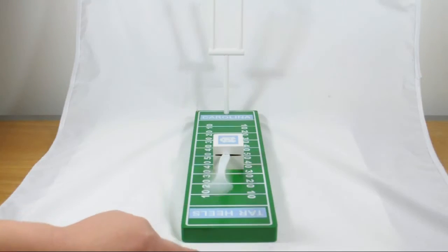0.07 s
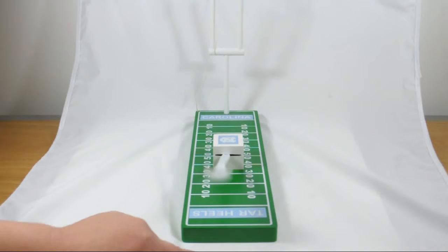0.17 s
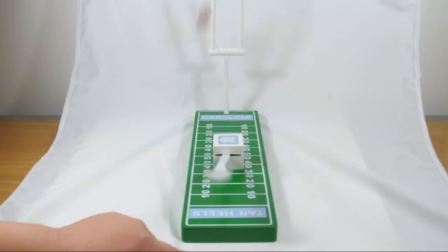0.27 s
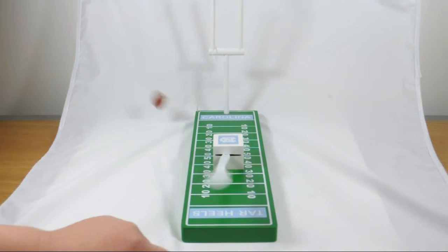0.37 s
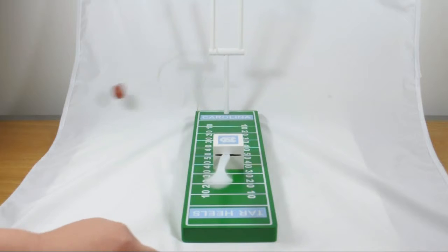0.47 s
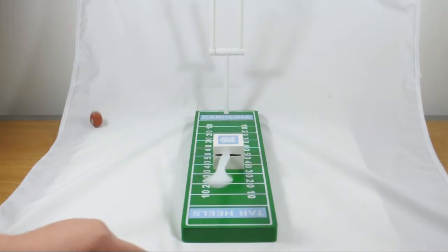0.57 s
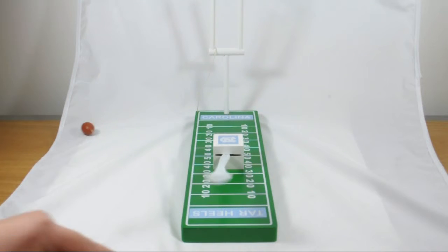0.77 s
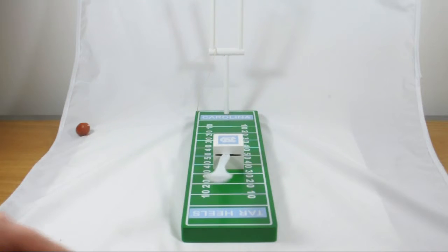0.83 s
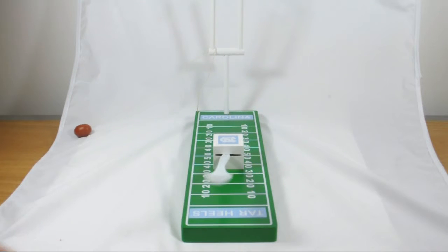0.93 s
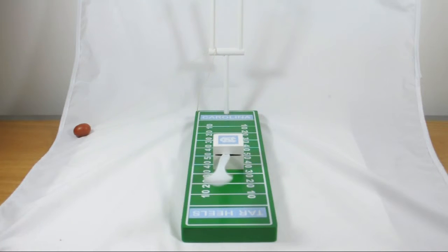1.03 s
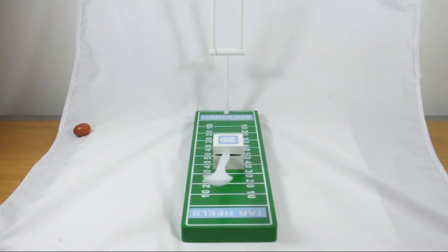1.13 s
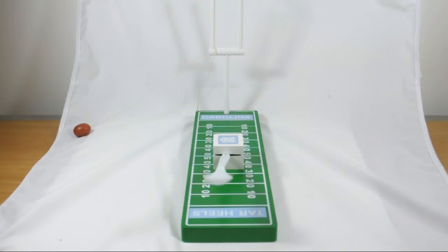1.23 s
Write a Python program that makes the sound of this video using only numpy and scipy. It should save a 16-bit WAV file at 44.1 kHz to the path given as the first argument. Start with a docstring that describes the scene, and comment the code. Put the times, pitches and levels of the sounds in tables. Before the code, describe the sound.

Sharp plastic snap of a toy catapult, then a small ball lands, hops and rolls.

```python
"""A plastic spoon launcher snaps against its stop, exciting its damped modes, and flicks a small wooden ball.
The ball lands with two hard clicks and a hollow knock from the modes of a cloth-covered table, then hops and
rolls to rest. At the start the launcher still rings from being touched. A live room reverberates over a faint
steady noise; the close microphone is dull on top and overloads on the first knock of the landing."""
import sys
import numpy as np
from scipy import signal
from scipy.fft import rfft, irfft, next_fast_len
from scipy.io import wavfile

SR = 44100
rng = np.random.default_rng(int(sys.argv[2]) if len(sys.argv) > 2 else 0)


def pcm_store(signal):
    """Save signal as 16-bit PCM."""
    levels = np.round(np.clip(np.atleast_2d(signal), -1, 1) * 32767)
    wavfile.write(sys.argv[1], SR, levels.astype(np.int16).T)


N = 57330

# the spoon's contacts with its stop (time [s], level [dB])
SNAP_CONTACTS = [(0.2079, 1), (.2112, -4), (.2160, -10)]
# the ball's hard contacts (time [s], level [dB], frequency [Hz], T60 [s])
BALL_CONTACTS = [(.4080, -8, 3620, 0.025), (0.4145, -6, 2811, 0.0067)]


def amp(db):
    """Amplitude ratio of a level in decibels."""
    return 10 ** (np.asarray(db) / 20)


def clock():
    """Time of each sample in seconds."""
    return np.arange(N) / SR


def decay(t60):
    """Exponential damping: 60 dB in t60 seconds."""
    return np.exp(-np.log(1000) * clock() / t60)


def delayed(x, seconds):
    """Pure time delay."""
    return np.pad(x, (max(round(seconds * SR), 0), 0))[:N]


def butterworth(x, order, corner_hz, kind="low"):
    """Maximally flat filter: 6 dB per octave per order beyond the corner."""
    return signal.lfilter(*signal.butter(order, corner_hz, kind, fs=SR), x)


def coloured(x, spectrum):
    """Minimum-phase filter through (frequency [Hz], level [dB]) points on a log frequency axis."""
    size = 2 * next_fast_len(N)
    hz, db = np.transpose(spectrum)
    gain_db = np.interp(np.log(np.fft.rfftfreq(size, 1 / SR) + 1), np.log(hz + 1), db)
    cepstrum = irfft(np.log(amp(gain_db)))
    cepstrum[1:size // 2] *= 2  # folding the cepstrum makes the filter causal
    cepstrum[size // 2 + 1:] = 0
    return irfft(rfft(x, size) * np.exp(rfft(cepstrum)))[:N]


def noise(spectrum):
    """Spectrally shaped Gaussian noise of unit rms."""
    x = coloured(rng.standard_normal(N), spectrum)
    return x / x.std()


def ring(modes, scatter_db=1.5):
    """Modal superposition: damped sines of alternating sign, their levels scattered at each blow."""
    out = np.zeros(N)
    for k, (hz, db, t60) in enumerate(modes):
        gain = (-1) ** k * amp(db + scatter_db * rng.standard_normal())
        out += gain * decay(t60) * np.sin(2 * np.pi * hz * clock())
    return out


def background():
    """Stationary noise, faint and weighted to low frequencies."""
    # noise spectrum (frequency [Hz], level [dB])
    spectrum = [(30, -5), (70, 1.5), (130, 1.5), (270, 3), (450, 0), (800, -4), (1050, 3), (1350, -5),
                (2500, -10.5), (4200, -13), (5300, -21), (7000, -31.5), (8000, -38)]
    return amp(-52) * noise(spectrum)


def reverberation(onset, db, spectrum):
    """Diffuse reflection: weak early sound, the full decay, and a bright echo scattered by the far wall."""
    # echo spectrum (frequency [Hz], level [dB])
    echo_spectrum = [(200, -17), (1500, -8), (2800, 6), (4400, 5.5), (5500, -14), (6500, -11),
                     (8000, -17.5)]
    early_db, walls_s, rise_s = -3.5, 0.042, 0.005
    echo_s, echo_width_s = 0.059, 0.0067
    build_up = 0.5 + 0.5 * np.tanh((clock() - walls_s) / rise_s)
    tail = noise(spectrum) * decay(t60=0.73) * amp(early_db * (1 - build_up))
    echo = amp(-4) * noise(echo_spectrum) * np.exp(-((clock() - echo_s) / echo_width_s) ** 2)
    return delayed(amp(db) * (tail + echo), onset)


def lingering_ring():
    """Free vibration: the touched launcher's modes die away with their reverberation."""
    # launcher modes (frequency [Hz], level [dB], T60 [s])
    modes = [(167.4, -12.5, 1.6), (527, -9.5, 0.2), (1408, 0, 0.23), (1746, -4, 0.25), (2945, -15.5, 0.53),
             (3035, -15, 0.6), (3090, -15.5, .6), (3973, -15.5, .32), (4154, -14.5, 0.36),
             (4145, -10, 0.54), (4538, -16.5, 0.61), (6874, -28, .39)]
    # reverberant spectrum (frequency [Hz], level [dB])
    spectrum = [(100, -3.5), (450, -1.5), (900, -6), (2200, -6), (3050, 0), (3600, -4.5), (4200, -0.5),
                (5200, -14.5), (7000, -19), (8000, -23)]
    return amp(-27) * ring(modes) + amp(-34.5) * decay(t60=0.64) * noise(spectrum)


def cloth_rub():
    """Sliding friction: one soft swell of noise on the cloth."""
    # friction spectrum (frequency [Hz], level [dB])
    spectrum = [(300, -19.5), (1100, -2), (4000, 3), (7000, -16)]
    centre_s, half_width_s = 1.129, 0.03
    return amp(-56.5) * noise(spectrum) * np.exp(-((clock() - centre_s) / half_width_s) ** 2)


def small_taps():
    """Cushioned impacts: one mode each, low-passed by the cloth's compliance."""
    # the spoon's release, then the settling ball (time [s], level [dB], frequency [Hz], T60 [s])
    contacts = [(0.2046, -24.5, 1420, .012), (.579, -33.5, 760, 0.07), (.589, -28, 850, 0.012),
                (.592, -33.5, 650, 0.032), (.641, -46, 800, 0.022), (0.875, -25, 970, 0.007)]
    taps = sum(delayed(ring([(hz, db, t60)]), onset) for onset, db, hz, t60 in contacts)
    return butterworth(taps, order=1, corner_hz=2500)


def rolling():
    """Random excitation: the rolling ball drives a low rumble in the table until it rests."""
    # rumble envelope (time [s], level [dB])
    envelope = [(.48, -56), (.5, -36.5), (.57, -44), (.65, -48.5), (.70, -46.5), (.78, -51.5), (.84, -54.5),
                (.95, -69.5)]
    # rumble spectrum (frequency [Hz], level [dB])
    spectrum = [(80, -20.5), (130, -9.5), (220, -5.5), (272, 3.5), (330, -15), (500, -19), (1000, -41.5),
                (4000, -63.5)]
    level_db = np.interp(clock(), *np.transpose(envelope), left=-120, right=-120)
    return amp(level_db) * noise(spectrum)


def table_knocks():
    """Impact excitation: each hop pushes and rings the table; softer contacts reach only its low modes."""
    # hops, harder with a higher corner (time [s], level [dB], corner frequency [Hz])
    hops = [(.4159, 3, 1700), (.4313, -6, 734), (0.4391, -5.5, 464), (0.445, -14, 710), (0.4683, -10, 380),
            (0.4966, -15.5, 279), (.551, -24, 250), (.670, -20.5, 158), (0.689, -29.5, 170),
            (0.712, -33, 170), (.808, -33.5, 190)]
    # table modes (frequency [Hz], level [dB], T60 [s])
    modes = [(206.5, -20, 0.27), (296.7, -2, 0.071), (363, 1.5, 0.046), (518.2, -1, 0.097),
             (711.5, -8, .13), (864, -11.5, 0.072)]
    push_hz, push_db, push_t60 = 502.7, 1, 0.028
    out = np.zeros(N)
    for onset, db, corner_hz in hops:
        blow = amp(-12.5) * ring(modes) + ring([(push_hz, push_db, push_t60)])
        out -= delayed(amp(db) * butterworth(blow, 2, corner_hz), onset)
    return butterworth(out, order=2, corner_hz=190, kind="high")  # the table radiates little bass


def ball_clicks():
    """Brief contact gives a broad spectrum: one short mode and a noise burst per click."""
    # burst spectrum (frequency [Hz], level [dB])
    spectrum = [(300, -13), (1200, -3), (2600, -2.5), (4600, -6), (5500, -19.5), (7200, -23), (8000, -13.5)]
    out = np.zeros(N)
    for onset, db, hz, t60 in BALL_CONTACTS:
        click = ring([(hz, 0, t60)]) + amp(-5) * decay(t60=0.024) * noise(spectrum)
        out += delayed(amp(db) * click, onset)
    return out


def base_recoil():
    """Reaction force: the launcher's base kicks against the table and rings."""
    # modes of the base on the table (frequency [Hz], level [dB], T60 [s])
    modes = [(115, -18.5, 0.19), (202, -15.5, 0.06), (292.5, -1, 0.043), (453, -4.5, 0.0473),
             (576, -7.5, 0.0418), (732, -7, 0.053)]
    push_hz, push_db, push_t60 = 430, -2, 0.011
    kick = amp(-9.5) * ring(modes) - ring([(push_hz, push_db, push_t60)])
    radiated = butterworth(kick, order=2, corner_hz=130, kind="high")  # a small base radiates little bass
    return delayed(radiated, seconds=0.209)


def spoon_snap():
    """Impact and rebound: the spoon chatters on its stop, each time with a pulse, a ring and a crack."""
    # launcher modes (frequency [Hz], level [dB], T60 [s])
    modes = [(1460, -4.5, 0.035), (1820, -7, 0.056), (2167, -8, 0.065), (2440, -8.5, 0.055),
             (2725, -13.5, 0.043), (3014, -3, 0.045), (3130, -3, 0.095), (3782, -2.5, 0.063),
             (4640, 5.5, 0.011), (6244, -4.5, 0.024)]
    # spectrum of pulse and crack (frequency [Hz], level [dB])
    spectrum = [(200, 0), (1000, -3.5), (2000, 0), (3000, 4.5), (4700, -12.5), (5500, -13.5), (6400, -17),
                (8000, -27)]
    pulse = coloured(signal.unit_impulse(N), spectrum)
    pulse /= np.abs(pulse).max()
    out = np.zeros(N)
    for onset, db in SNAP_CONTACTS:
        ringing = amp(-15) * ring(modes)
        crack = amp(-6) * decay(t60=0.032) * noise(spectrum)
        out += delayed(amp(db) * (pulse + ringing + crack), onset)
    return out


def scene():
    """Superposition of the flick, the landing, their reverberation and the steady noise."""
    # reverberant spectra of the flick and the landing (frequency [Hz], level [dB])
    flick_spectrum = [(60, -35), (110, -13), (200, -12), (340, -6), (700, -9), (1100, -7.5), (1700, -4.5),
                      (2300, 3.5), (3200, -1), (4000, -7.5), (4700, -10.5), (5500, -23.5), (6400, -21.5),
                      (7200, -29), (8000, -25.5)]
    landing_spectrum = [(100, -13), (300, 5), (600, 3.5), (1100, -0.5), (2000, -4.5), (3000, -5.5),
                        (3800, -0.5), (4700, -10), (5500, -27), (6500, -19.5), (8000, -29.5)]
    flick = lingering_ring() + spoon_snap() + base_recoil()
    flick += reverberation(SNAP_CONTACTS[0][0], db=-18, spectrum=flick_spectrum)
    landing = ball_clicks() + table_knocks()
    landing += reverberation(BALL_CONTACTS[0][0], db=-31.5, spectrum=landing_spectrum)
    return (flick + landing + rolling() + small_taps() + cloth_rub() + background())[None]


def record(dry):
    """Saturation: a dull microphone clips the peaks, and a low-pass limits the band."""
    # microphone response (frequency [Hz], level [dB])
    response = [(20, -16), (60, -12.5), (110, -3.5), (7000, 2), (7700, -9), (8300, -23), (9500, -58)]
    clip_level, top_hz = 0.88, 16000
    clipped = np.clip(coloured(dry[0], response), -clip_level, clip_level)
    return signal.sosfilt(signal.butter(12, top_hz, fs=SR, output="sos"), clipped)[None]


dry = scene()
out = record(dry)
pcm_store(out)
```